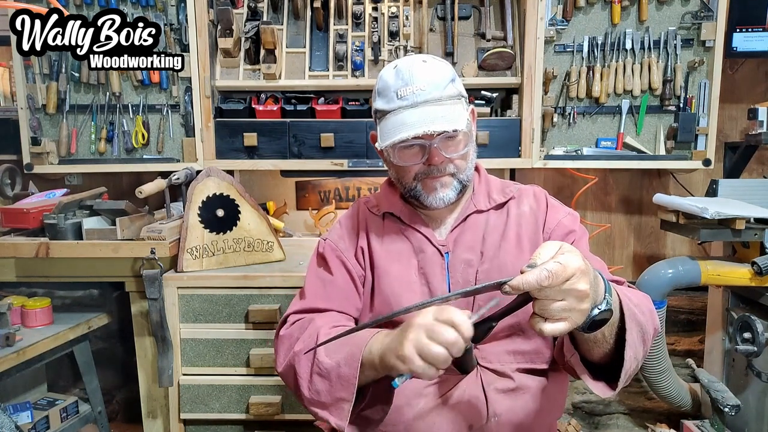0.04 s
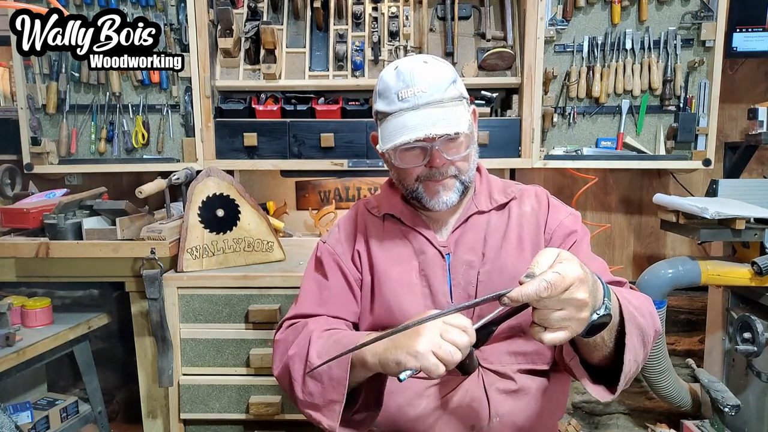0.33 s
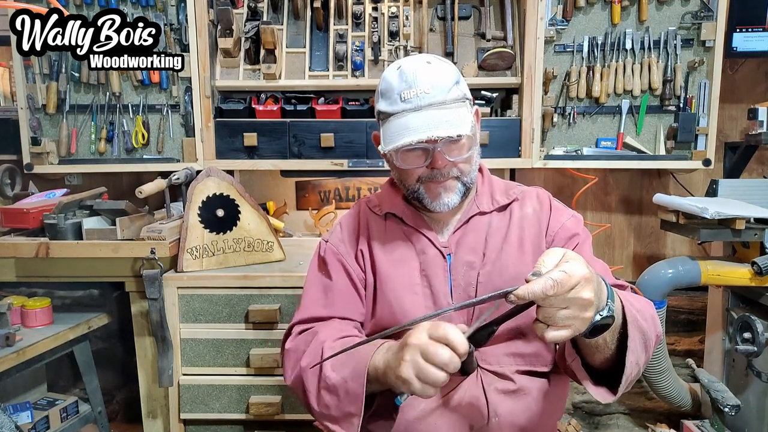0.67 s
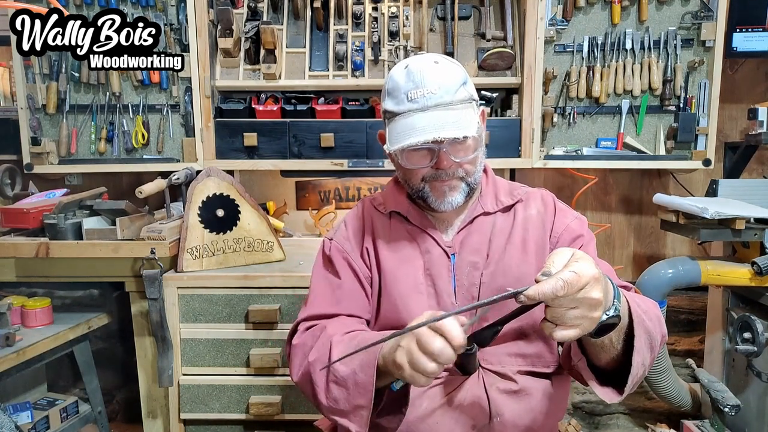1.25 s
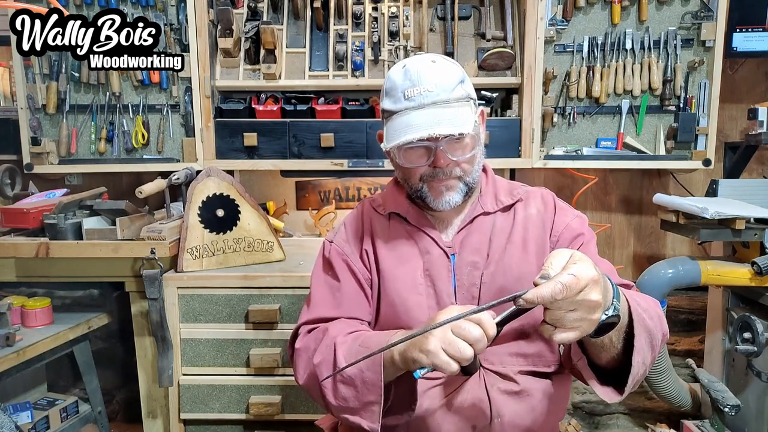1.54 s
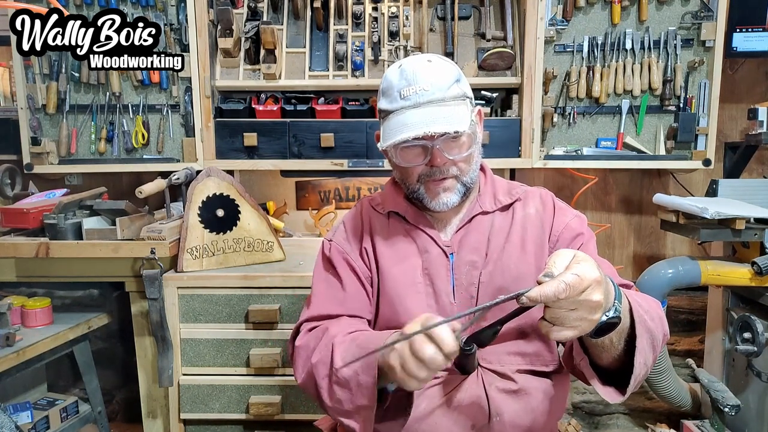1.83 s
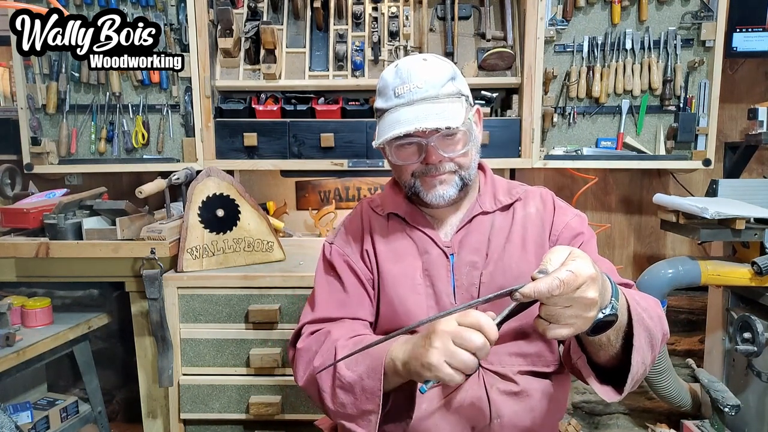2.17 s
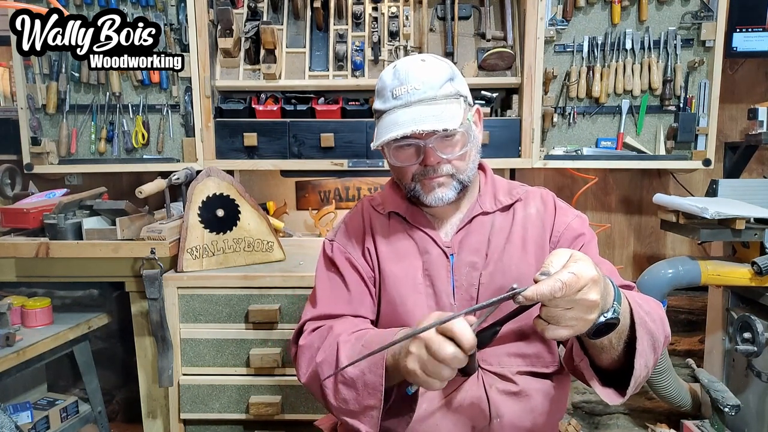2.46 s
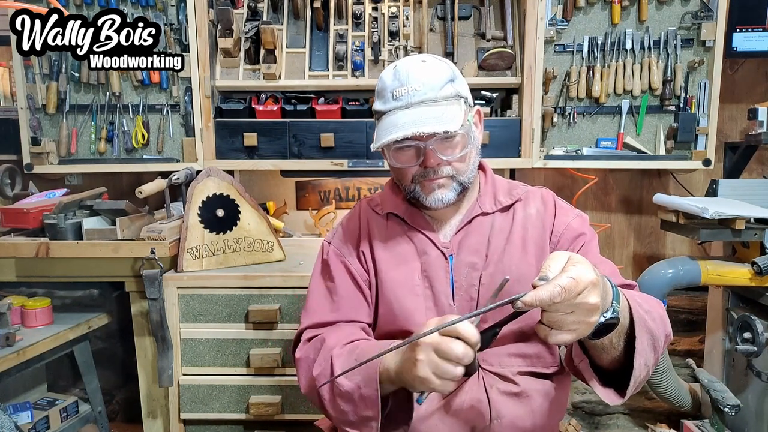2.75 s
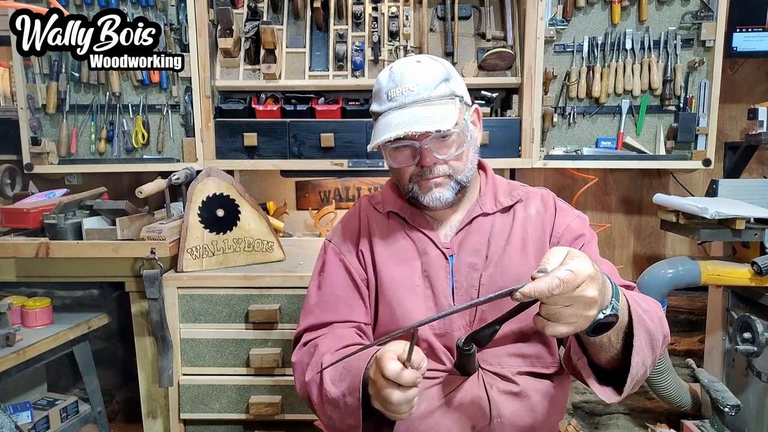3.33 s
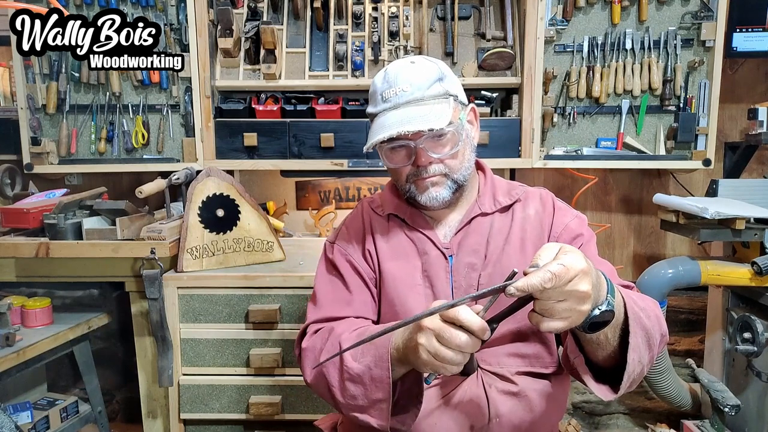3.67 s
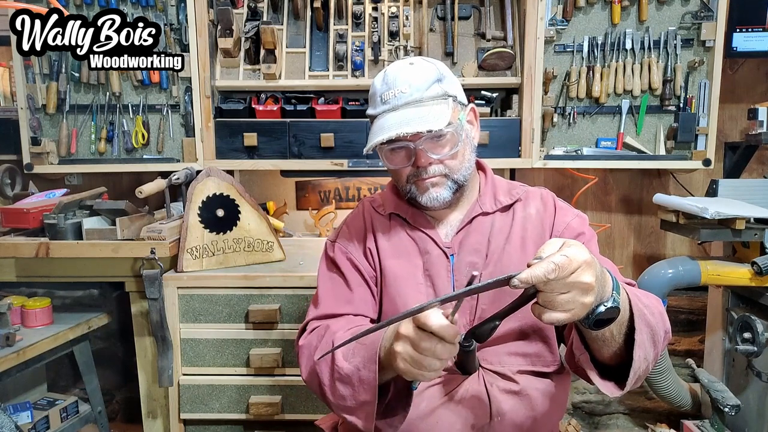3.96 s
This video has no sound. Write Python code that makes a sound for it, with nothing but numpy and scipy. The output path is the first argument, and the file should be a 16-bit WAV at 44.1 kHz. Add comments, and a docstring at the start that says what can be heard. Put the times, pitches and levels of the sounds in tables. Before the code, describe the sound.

A hand-held sharpener scrapes along a steel blade about seven times, close to the microphone in a small, quiet workshop. Each stroke lands with a clack, rasps lightly, then bites harder, often ending in a brief squeal.

```python
"""A hand-held sharpener drawn along a steel blade, close to the microphone in a small, quiet workshop.
About three strokes come in two seconds. The tool lands with a clack, rasps lightly, then bites harder
and squeals briefly as it lifts off. The blade's resonances colour the rasp and shift as the contact
slides. Behind it the room answers over a faint hum; the recorder thins the low mids of loud moments."""
import sys
import numpy as np
from scipy import signal
from scipy.fft import rfft, irfft, next_fast_len
from scipy.io import wavfile
from scipy.ndimage import uniform_filter1d, map_coordinates

SR = 44100
rng = np.random.default_rng(int(sys.argv[2]) if len(sys.argv) > 2 else 0)


def transcribe(u):
    """Save the signal u as a 16-bit wav file named by the first command-line argument.

    u: samples, shape (n,) or (channels, n), limited to [-1, 1]; the rate is SR.
    q: integer samples, one column per channel.
    """
    v = np.clip(np.atleast_2d(u).T, -1, 1)
    q = np.round(v * 32767).astype(np.int16)
    wavfile.write(sys.argv[1], SR, q)


N = 176400
EVENT_S = 0.2  # time allowed for one short sound


def amp(db):
    """Decibels to gain."""
    return 10 ** (np.asarray(db) / 20)


def unit(x):
    """Scale to rms 1."""
    return x / np.sqrt(np.mean(x ** 2) + 1e-20)


def along(points, hz):
    """Read a curve of (Hz, value) points on a log frequency axis."""
    point_hz, values = np.transpose(points)
    return np.interp(np.log(hz + 1), np.log(point_hz + 1), values)


def clock(size=N):
    """Time of each sample in seconds."""
    return np.arange(size) / SR


def wobble(rate, size=N):
    """A smooth random curve with `rate` knots a second."""
    return map_coordinates(rng.standard_normal(4096), [clock(size) * rate])


def filtered(x, response):
    """Shape x by a gain that depends on frequency."""
    padded = next_fast_len(len(x) + 4096, True)
    return irfft(rfft(x, padded) * response(np.fft.rfftfreq(padded, 1 / SR)), padded)[:len(x)]


def band(x, centre_hz, width_octaves):
    """Keep a bell-shaped band of x."""
    return filtered(x, lambda hz: np.exp(-(np.log2((hz + 1) / centre_hz) / width_octaves) ** 2))


def octaves(hz):
    """Octaves above 4 kHz, the middle of the rasp."""
    return np.log2(np.maximum(hz, 500) / 4000)


def noise(spectrum, tilt_db=0, size=N):
    """Coloured noise of rms 1, tilted by tilt_db per octave."""
    white = rng.standard_normal(size)
    return unit(filtered(white, lambda hz: amp(along(spectrum, hz) + tilt_db * octaves(hz))))


def add(out, s, sound):
    """Mix a short sound in at s seconds."""
    part = out[round(s * SR):][:len(sound)]
    part += sound[:len(part)]


# The strokes, close up, one list apiece. Each row: time in seconds, then the relative levels
# of the rasp, its low body and its treble in dB.
STROKE_LEVELS = [
    [(0.0, -55.5, -83, -56), (0.044, -49.5, -64, -51.5), (0.124, -33, -44.5, -35.5), (0.132, -29, -45, -33),
     (0.138, -33, -47, -30)],
    [(0.385, -40, -37, -44), (0.405, -49.5, -72, -47), (0.485, -49.5, -72, -53), (0.549, -51.5, -63, -54.5),
     (0.591, -42, -58.5, -48), (0.623, -53, -56.5, -56.5), (0.685, -36.5, -47.5, -39),
     (0.727, -33.5, -43.5, -36), (0.753, -30, -41.5, -27), (0.762, -30.5, -44, -27.5)],
    [(0.985, -33, -33.5, -37), (1.007, -39, -68, -40), (1.035, -32, -46, -35), (1.059, -40.5, -52.5, -42),
     (1.087, -48, -66, -48), (1.129, -40.5, -51, -42), (1.197, -45, -56.5, -48),
     (1.297, -34.5, -53.5, -36.5), (1.321, -31.5, -49, -25.5), (1.326, -44, -74, -27.5)],
    [(1.575, -51, -42, -49), (1.593, -44.5, -64, -48), (1.701, -46.5, -56.5, -49.5), (1.775, -41, -54, -45),
     (1.825, -47, -55.5, -46.5), (1.861, -38.5, -48, -38), (1.887, -38, -51.5, -35.5),
     (1.915, -25.5, -49, -29.5), (1.944, -35.5, -52, -28.5)],
    [(2.225, -43, -50.5, -39.5), (2.245, -42.5, -61, -48), (2.317, -36.5, -47.5, -40.5),
     (2.485, -51, -64, -56), (2.579, -36.5, -52, -38), (2.603, -38.5, -56, -40), (2.621, -38, -73, -28.5),
     (2.649, -37.5, -49.5, -36.5), (2.663, -29.5, -38.5, -25), (2.676, -25, -46.5, -26)],
    [(3.04, -45, -39, -43), (3.076, -35.5, -63, -50), (3.13, -54, -65, -58.5), (3.25, -37, -49.5, -43),
     (3.276, -40.5, -56, -48.5), (3.322, -52, -66, -50), (3.365, -36, -48.5, -38.5), (3.397, -25, -43, -28),
     (3.401, -24.5, -35, -24), (3.436, -17.5, -26.5, -18.5), (3.441, -28, -46, -18.5)],
    [(3.835, -47, -57, -52.5), (3.88, -50, -79, -57), (3.92, -47, -74, -48), (3.955, -42, -62, -42.5),
     (4.0, -50.5, -53.5, -47)],
]
# The colours of those three bands. Each row: frequency in Hz, relative level in dB.
RASP_SPECTRUM = [(900, -44), (1250, -11), (1520, -4), (2200, 0.5), (2700, 0.5), (3500, 0), (5000, -2),
                 (6500, -16.5), (9000, -46.5)]
BODY_SPECTRUM = [(100, -26.5), (230, -6.5), (350, -13), (480, -7), (630, -3.5), (1040, -1), (1200, -18.5),
                 (1600, -36)]
TREBLE_SPECTRUM = [(3500, -33.5), (5000, -9), (6200, -1), (8900, 1.5), (9600, -7), (13000, -6.5),
                   (15700, -10.5)]


def scraping(bite_s=0.01, lift_db_per_s=1502, scatter_s=0.056, judder_db=0.9, ring_db=-14.5):
    """The tool bites, rasps along the edge and lifts off; the friction sets the blade ringing."""
    t, levels, slid_s = clock(), np.zeros((3, N)), np.zeros(N)
    for rows in STROKE_LEVELS:
        times, *bands_db = np.transpose(rows)
        start, end = times[0], times[-1]
        on = (t > start - bite_s) & (t < end + EVENT_S / 4)
        bite = np.clip((t[on] - start) / bite_s + 1, 0, 1)
        lift = amp(-lift_db_per_s * np.maximum(t[on] - end, 0))
        levels[:, on] += bite * lift * amp([np.interp(t[on], times, db) for db in bands_db])
        slid_s[on] = t[on] - start + scatter_s * rng.standard_normal()  # each starts at a new spot
    rasp, body, treble = levels * unit(amp(judder_db * wobble(150)))
    hz, friction = sliding(slid_s, rasp_db=20 * np.log10(levels[0] + 1e-9))
    force = np.zeros(N)
    for level, spectrum, trim_db in [(rasp, RASP_SPECTRUM, -2.5), (body, BODY_SPECTRUM, -1),
                                     (treble, TREBLE_SPECTRUM, -1.3)]:
        _, rub = signal.istft(friction * amp(along(spectrum, hz))[:, None])
        force += amp(trim_db) * level * unit(rub[:N])
    return force + amp(ring_db) * blade(force, struck=False)


def sliding(slid_s, rasp_db, turns=5.5, turns_per_s=3.064, ripple_db=6.5, blur_hz=3300, patchy_db=4):
    """Short-time spectrum of the friction: standing waves either side of the contact glide with it."""
    hz, t, friction = signal.stft(grit(), SR, nperseg=1024)
    travel = turns_per_s * np.interp(t, clock(), slid_s)
    wave = 2 * np.pi * np.sqrt(hz / 1000)[:, None]  # turns are counted at 1 kHz
    behind, ahead = rng.uniform(0, 2 * np.pi, 2)
    ripple = np.cos(wave * (turns - travel) + behind) + np.cos(wave * (2 * turns + travel) + ahead)
    depth_db = ripple_db / (1 + (hz[:, None] / blur_hz) ** 2)
    # a bite harder than -42 dB thins the low end
    bite_db = np.maximum(np.interp(t, clock(), rasp_db) + 42, 0)
    thinning_db = 0.45 * bite_db * np.clip(octaves(hz), -1.5, 0)[:, None]
    # the uneven edge makes the colour flicker
    patches = uniform_filter1d(rng.standard_normal(friction.shape), size=4, axis=0)
    patches = unit(uniform_filter1d(patches, size=4, axis=1))
    return hz, friction * amp(depth_db * ripple + thinning_db + patchy_db * patches)


def grit(grains_per_s=1800, spread_db=4, hiss_share=0.42):
    """Friction force: tiny fractures of uneven size over a smooth hiss."""
    fractures = (rng.random(N) < grains_per_s / SR) * rng.choice([-1, 1], N)
    grains = unit(fractures * amp(spread_db * rng.standard_normal(N)))
    return np.sqrt(1 - hiss_share) * grains + np.sqrt(hiss_share) * rng.standard_normal(N)


# The blade's modes. Each row: pitch in Hz, time to fall 60 dB in seconds, relative level in dB
# when struck, and when scraped.
BLADE_MODES = [(791, .09, -7, -22), (2095, .045, -10, -9), (2382, .05, -14, -7), (2700, .06, -5, -12),
               (3312, .06, -12, -4), (3832, .035, -7, -8), (4725, .04, -10, -10), (5160, .08, 0, -10),
               (5760, .025, -14, -6), (6960, .02, -7, -4.5), (7650, .05, -14, -9), (8620, .03, -2, -3),
               (10220, .04, -11, -10), (11200, .03, -16, -10)]


def blade(force, struck):
    """A force drives the steel's decaying modes; white noise would keep its level."""
    t, ring = clock(SR // 5), 0
    for hz, t60, struck_db, scraped_db in BLADE_MODES:
        decay = amp((struck_db if struck else scraped_db) - 60 * t / t60)
        ring += decay / np.sqrt(t60) * np.sin(2 * np.pi * hz * t)
    return signal.fftconvolve(force, ring / np.linalg.norm(ring))[:N]


# The tool landing on the blade. Each row: start in seconds, relative level in dB, brightness in dB
# per octave, relative blade ring in dB, low and high pitch of the contact spot in Hz.
TOOL_LANDINGS = [(0.3697, -17.5, 9, -9.5, 795, 2746), (0.9701, -17, 7.5, -10, 800, 2070),
                 (1.56, -22, 0, -10.5, 922, 2105), (2.2122, -27.5, -3.5, -30, 860, 1740),
                 (3.0254, -26.5, 3, -12, 649, 1900), (3.8186, -26, -2, -14, 746, 2060)]
# The colour of the clack. Each row: frequency in Hz, relative level in dB.
CLACK_SPECTRUM = [(80, -33), (250, -19.5), (500, -7), (950, -7.5), (1230, -14), (1800, 0.5), (4000, 2),
                  (8500, -7), (10500, -15), (15700, -22)]


def landings(rise_s=0.00035, hold_s=0.0046, t60_s=0.042, knock_t60_s=0.19, clink_t60_s=0.064):
    """Steel meets steel: a few milliseconds of chatter, and the contact spot and blade ring."""
    t, (contact, blows) = clock(int(EVENT_S * SR)), np.zeros((2, N))
    burst = np.minimum(t / rise_s, 1) * amp(-60 * np.maximum(t - hold_s, 0) / t60_s)
    for s, db, tilt_db, ring_db, low_hz, high_hz in TOOL_LANDINGS:
        knock = amp(-45.5 - 60 * t / knock_t60_s) * np.sin(2 * np.pi * low_hz * t)
        clink = amp(-32 - 60 * t / clink_t60_s) * np.sin(2 * np.pi * high_hz * t)
        chatter = amp(db - 4.5) * burst * noise(CLACK_SPECTRUM, tilt_db, size=len(t))
        add(contact, s, knock + clink + chatter)
        blows[round(s * SR)] = np.linalg.norm(burst) * amp(db + ring_db)
    low_cut = signal.butter(2, 342, 'high', fs=SR, output='sos')  # the landings carry little below about 340 Hz
    return signal.sosfilt(low_cut, contact + blade(blows, struck=True))


# Squeals at the edge. Each row: centre in seconds, width in seconds, pitch in Hz, relative level in dB.
EDGE_SQUEALS = [(0.755, 0.021, 7000, -30.5), (1.329, 0.024, 7700, -39.5), (1.896, 0.015, 2150, -37.5),
                (1.914, .018, 8760, -38), (2.666, 0.035, 3476, -33.5), (2.669, 0.026, 5770, -34.5),
                (3.405, 0.0095, 5810, -24), (3.436, 0.017, 6970, -23), (3.437, 0.016, 3770, -26)]


def squeals(waver_hz=45, waver_per_s=250, gain_db=4):
    """Under pressure the slipping locks briefly onto one resonance."""
    t, out = clock(int(EVENT_S * SR)) - EVENT_S / 2, np.zeros(N)
    for s, width, hz, db in EDGE_SQUEALS:
        phase = 2 * np.pi * np.cumsum(hz + waver_hz * wobble(waver_per_s, len(t))) / SR
        swell = amp(db + gain_db) * np.exp(-2 * (t / width) ** 2)
        add(out, s - EVENT_S / 2, swell * np.sin(phase))
    return out


# Standing waves that stand out. Each row: centre in seconds, width in seconds, pitch in Hz,
# glide in Hz per second, relative level in dB.
GLIDING_TONES = [(0.422, 0.048, 2630, -1500, -48), (0.456, 0.024, 2075, 0, -47.5),
                 (0.594, 0.043, 2064, -6, -46.5), (0.605, 0.14, 667, 1199, -56),
                 (0.734, 0.042, 1625, -3000, -37.5), (0.735, 0.071, 1007, 1503, -49),
                 (1.253, 0.042, 2000, -3000, -42.5), (2.308, 0.046, 2377, 2009, -41),
                 (2.309, 0.033, 1532, -2000, -45), (2.585, 0.014, 2050, -3000, -61),
                 (2.599, .055, 1055, 2991, -58), (3.11, 0.086, 688, 545.5, -53.5),
                 (3.266, .055, 1021, 2501, -52), (3.375, 0.041, 1890, 992, -44.5),
                 (3.418, 0.043, 780, -1000, -48.5), (3.974, 0.043, 1020, 2504, -57.5)]


def glides(waver_hz=18, waver_per_s=120, rough_db=2, gain_db=-1):
    """Single resonances sing out of the rasp; their pitch follows the contact point."""
    t, out = clock(int(2 * EVENT_S * SR)) - EVENT_S, np.zeros(N)
    for s, width, hz, hz_per_s, db in GLIDING_TONES:
        pitch = hz + hz_per_s * t + waver_hz * wobble(waver_per_s, len(t))
        roughness = amp(rough_db * wobble(waver_per_s, len(t)))
        tone = unit(roughness * np.sin(2 * np.pi * np.cumsum(pitch) / SR))
        swell = amp(db + gain_db) * np.exp(-2 * (t / width) ** 2)
        add(out, s - EVENT_S, swell * tone)
    return out


# Burrs along the edge. Each row: start in seconds, level in dB.
BURRS = [(0.688, -33.5), (1.033, -45), (1.936, -33.5), (3.194, -38.5), (3.401, -34.5)]


def catches(t60_s=0.075, tilt_db=7):
    """The tool catches on a burr and the rasp gives a short, sharp surge."""
    t, out = clock(int(EVENT_S * SR)), np.zeros(N)
    for s, db in BURRS:
        add(out, s, amp(db - 60 * t / t60_s) * noise(RASP_SPECTRUM, tilt_db, size=len(t)))
    return out


# Soft, low thumps. Each row: start in seconds, level in dB, band centre in Hz.
LOW_THUMPS = [(1.52, -58, 480), (2.093, -50.5, 590), (3.026, -49, 380), (3.039, -44, 174.6),
              (3.821, -45.5, 320)]


def thumps(rise_s=0.0051, t60_s=0.062):
    """Dull low knocks, some alone, some under the tool's landings on the blade."""
    t, out = clock(int(EVENT_S * SR)), np.zeros(N)
    for s, db, hz in LOW_THUMPS:
        thud = unit(band(rng.standard_normal(len(t)), hz, width_octaves=0.97))
        add(out, s, thud * np.minimum(t / rise_s, 1) * amp(db - 60 * t / t60_s))
    return out


# The workshop's reverberation. Each row: frequency in Hz, time to fall 60 dB in seconds.
WORKSHOP_DECAY = [(200, 0.54), (1300, 0.35), (3500, 0.37), (8000, 0.31), (15000, .3)]


def workshop(x, build_s=0.013, dull_hz=14400):
    """The room's short, diffuse answer reaches the microphone just after the direct sound."""
    hz, t, diffuse = signal.stft(rng.standard_normal(SR // 2), SR, nperseg=256)
    decay = amp(-60 * t / along(WORKSHOP_DECAY, hz)[:, None])
    dulling = np.hypot(1, (hz[:, None] / dull_hz) ** 2)
    _, tail = signal.istft(diffuse * decay / dulling, SR, nperseg=256)
    tail *= np.clip(clock(len(tail)) / build_s - 0.5, 0, 1)
    return signal.fftconvolve(x, tail / np.linalg.norm(tail))[:N]


# The air all around the microphone. Each row: frequency in Hz, relative level in dB.
AIR_SPECTRUM = [(25, -68.5), (60, -75), (170, -78.5), (270, -79.5), (370, -93.5), (520, -80), (900, -88),
                (2000, -91), (7000, -100), (15700, -98.5)]
# The hum in the background. Each row: pitch in Hz, level in dB.
HUM_TONES = [(101, -71.5), (120, -75.5)]


def room_tone(air_db=-62.5):
    """Still air and a faint electrical hum."""
    hum = np.zeros(N)
    for hz, db in HUM_TONES:
        hum += amp(db) * np.sqrt(2) * np.sin(2 * np.pi * hz * clock() + 0.4 * wobble(2.6))
    return amp(air_db) * noise(AIR_SPECTRUM) + hum


def scene():
    """One microphone position: the sharpening close up, the workshop behind it."""
    strokes = scraping() + catches()
    zings = squeals() + glides()
    clacks = landings() + thumps()
    into_room = amp(-12.5) * strokes + amp(-19.5) * zings + amp(-18) * clacks
    sway = 0.79 * np.pi * wobble(85)  # moving hands and blade keep changing the paths into the room
    answer = workshop(into_room) * np.cos(sway) + workshop(into_room) * np.sin(sway)
    return (strokes + zings + clacks + answer + room_tone())[None]


def suppressor(x, threshold_db=-37, window_s=0.04):
    """The recorder's noise suppressor turns the low mids down while the sound stays loud."""
    low_mids = band(x, centre_hz=300, width_octaves=0.83)
    power = np.abs(uniform_filter1d(x ** 2, SR // 200)) + 1e-12
    level_db = uniform_filter1d(10 * np.log10(power), int(window_s * SR))
    excess = amp(level_db - threshold_db) ** 2
    return x - low_mids * excess / (1 + excess)


def record(dry):
    """The microphone has a narrow dip; the recorder suppresses noise and cuts off the very top."""
    dip_hz, dip_width_hz, dip_db, top_hz = 1190, 134, -8.5, 15850
    dip = lambda hz: amp(dip_db * np.exp(-((hz - dip_hz) / dip_width_hz) ** 2))
    return filtered(suppressor(dry[0]), lambda hz: dip(hz) * (hz < top_hz))[None]


dry = scene()
out = record(dry)
transcribe(out)
```